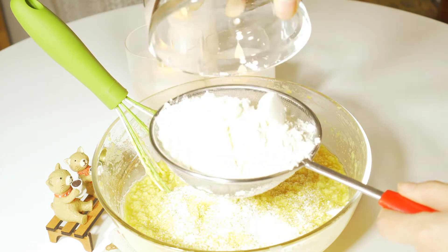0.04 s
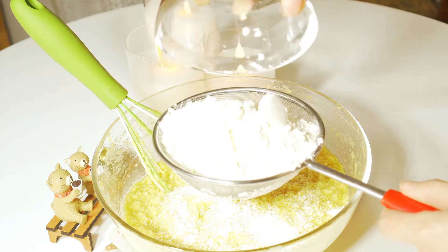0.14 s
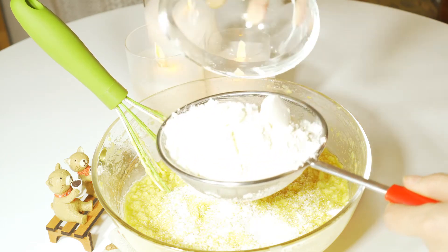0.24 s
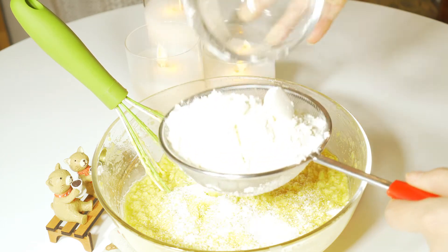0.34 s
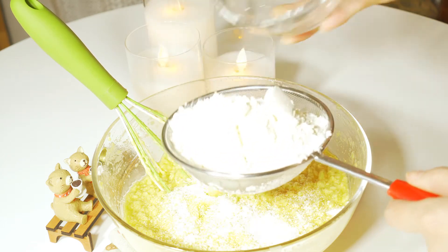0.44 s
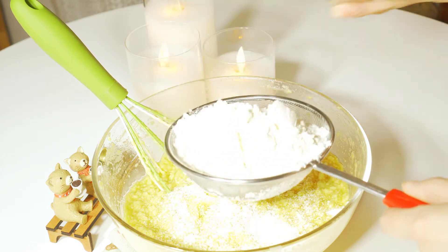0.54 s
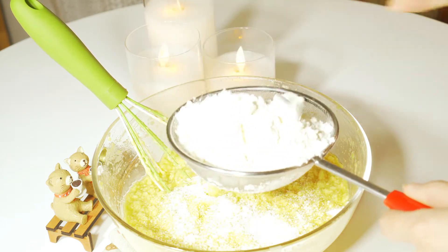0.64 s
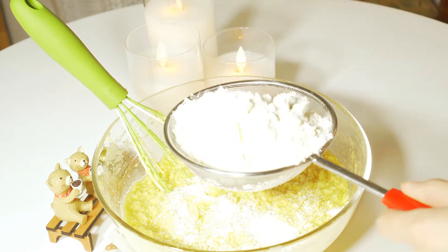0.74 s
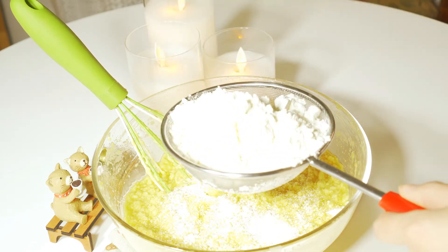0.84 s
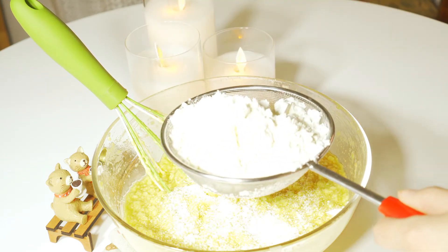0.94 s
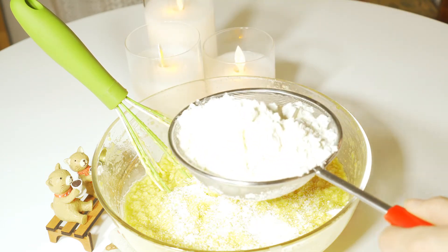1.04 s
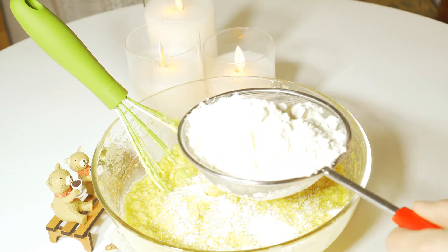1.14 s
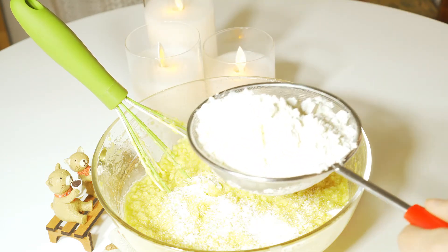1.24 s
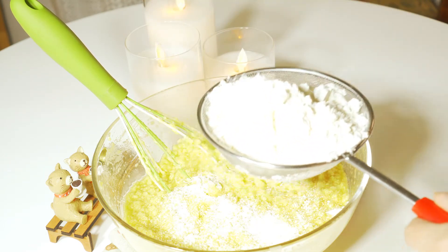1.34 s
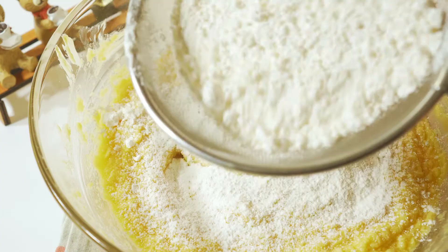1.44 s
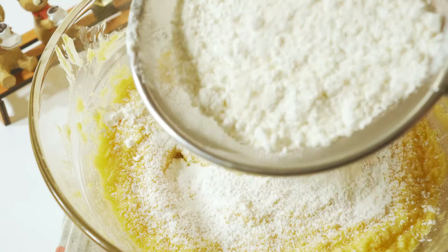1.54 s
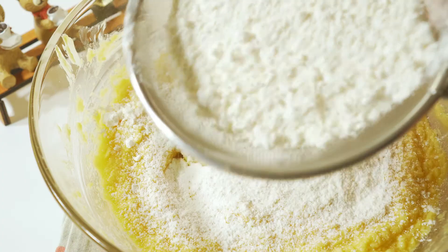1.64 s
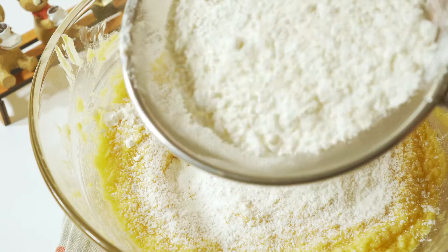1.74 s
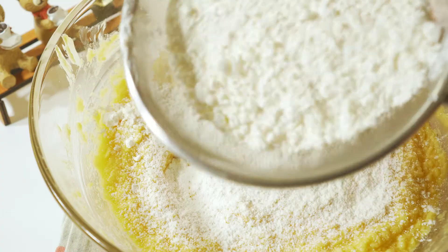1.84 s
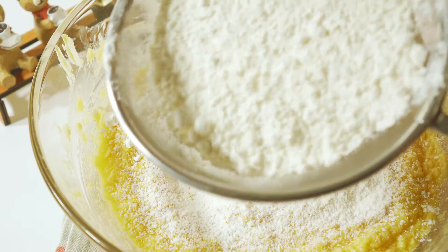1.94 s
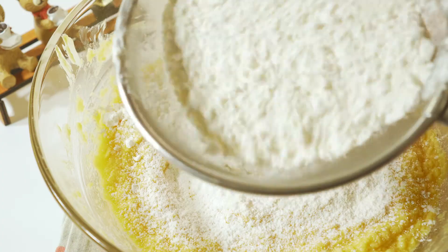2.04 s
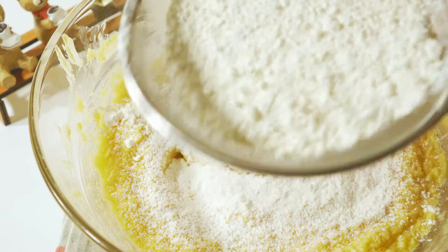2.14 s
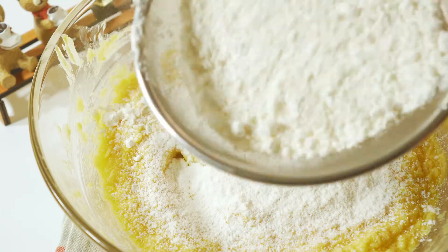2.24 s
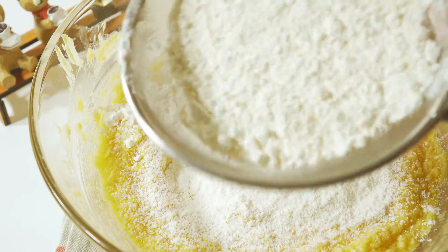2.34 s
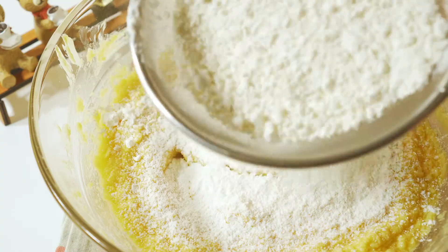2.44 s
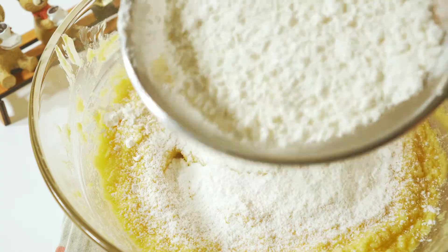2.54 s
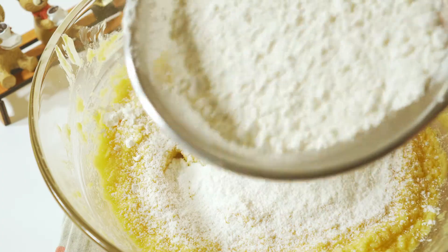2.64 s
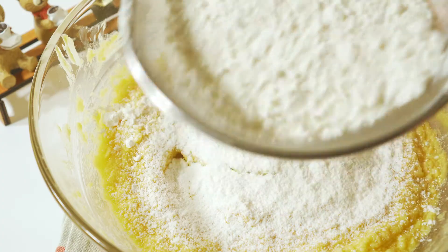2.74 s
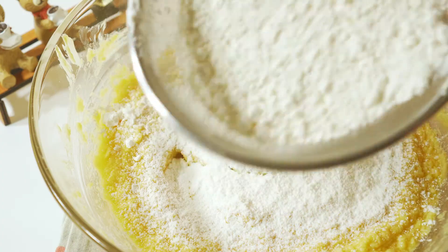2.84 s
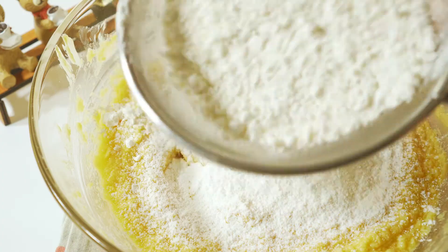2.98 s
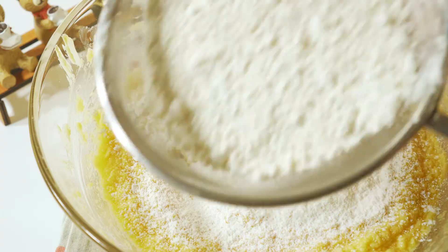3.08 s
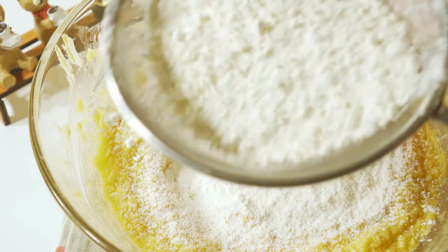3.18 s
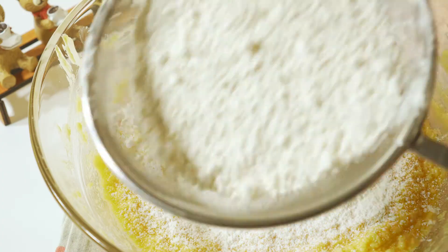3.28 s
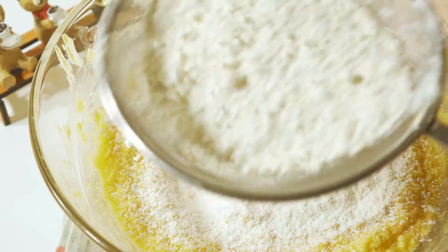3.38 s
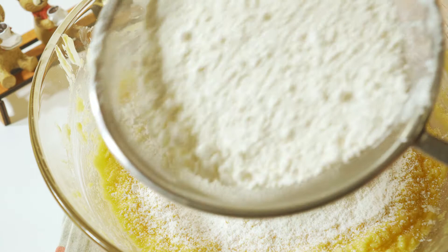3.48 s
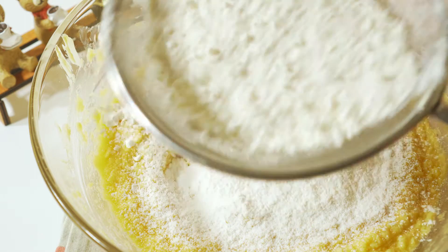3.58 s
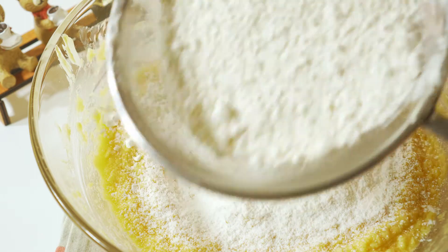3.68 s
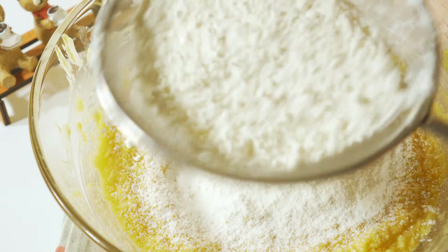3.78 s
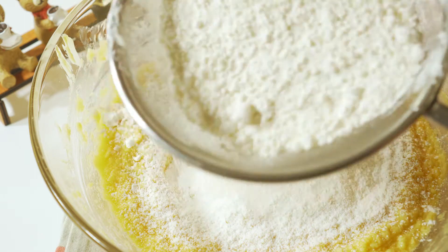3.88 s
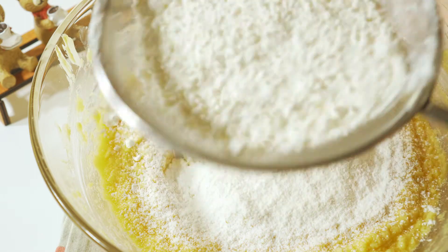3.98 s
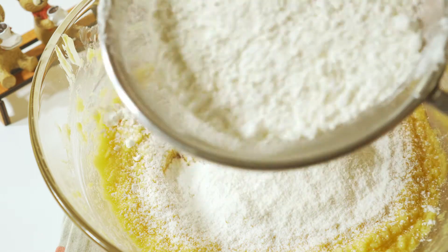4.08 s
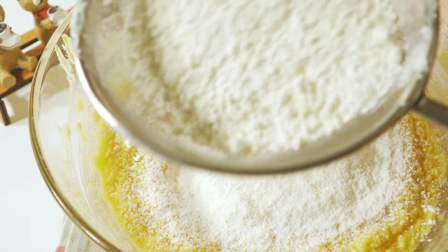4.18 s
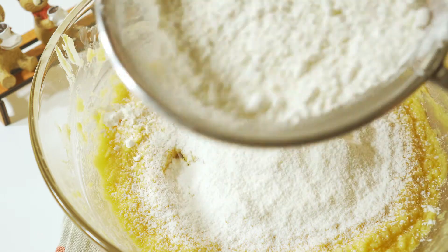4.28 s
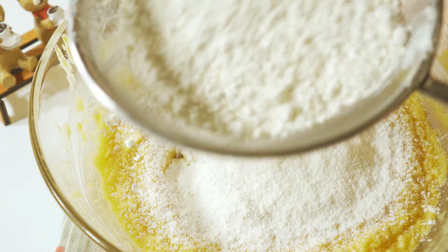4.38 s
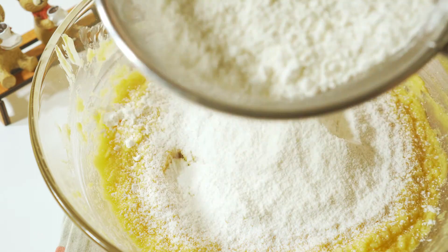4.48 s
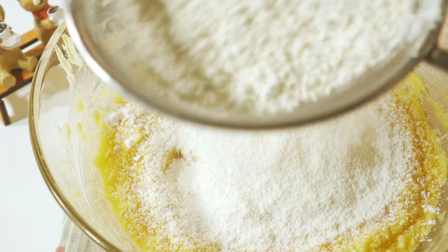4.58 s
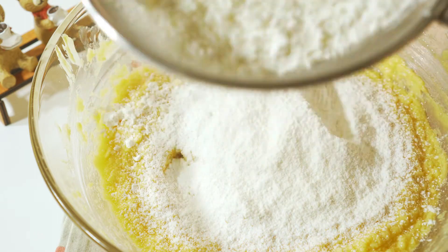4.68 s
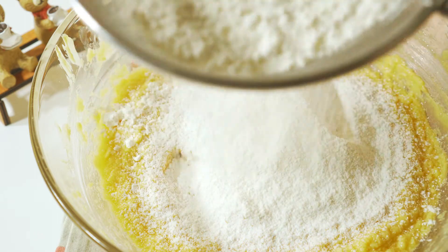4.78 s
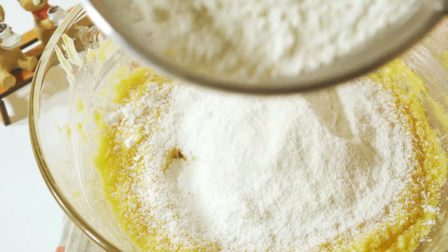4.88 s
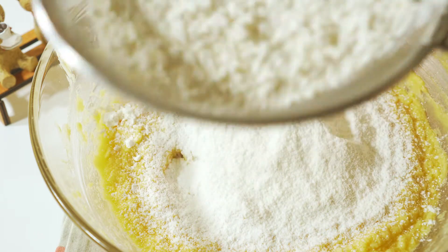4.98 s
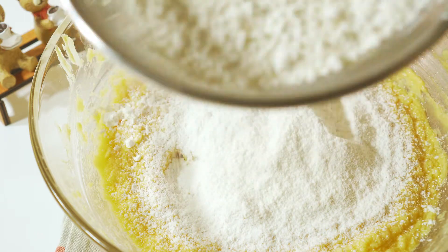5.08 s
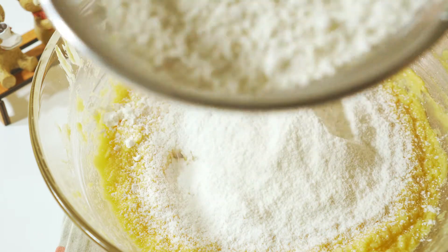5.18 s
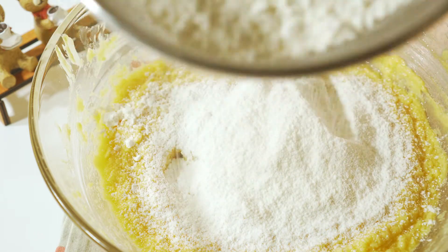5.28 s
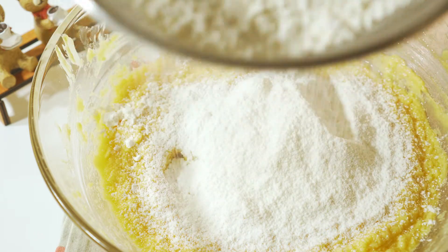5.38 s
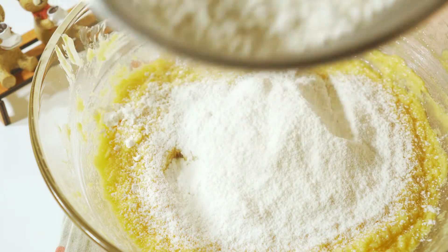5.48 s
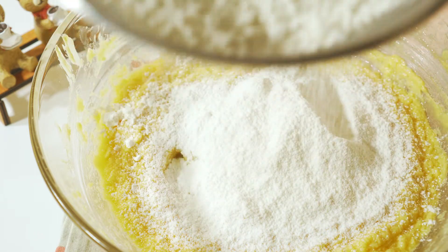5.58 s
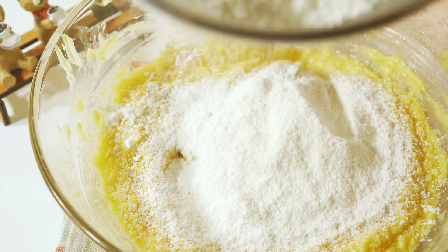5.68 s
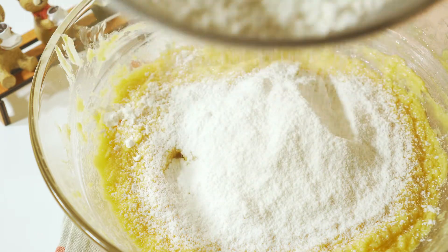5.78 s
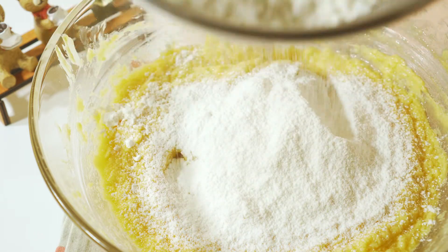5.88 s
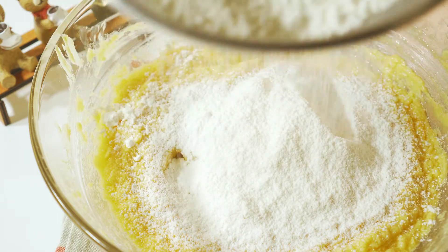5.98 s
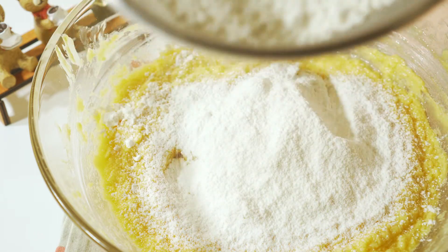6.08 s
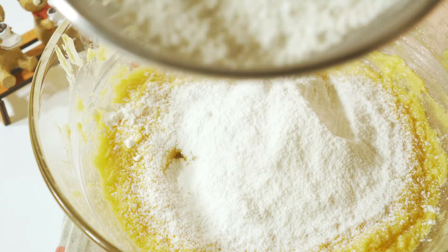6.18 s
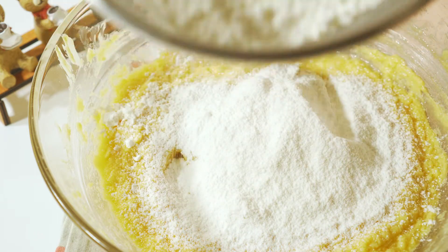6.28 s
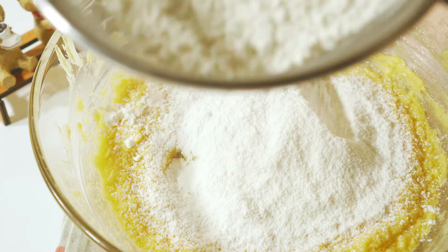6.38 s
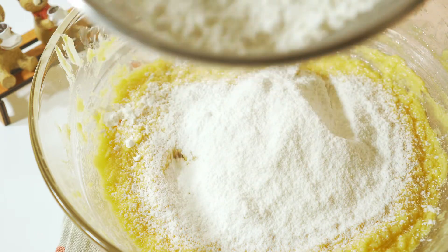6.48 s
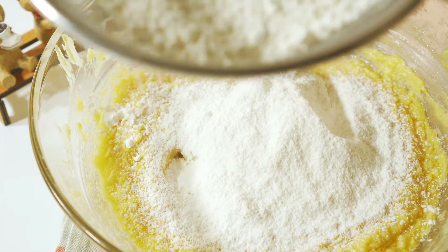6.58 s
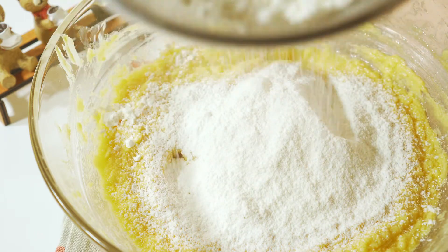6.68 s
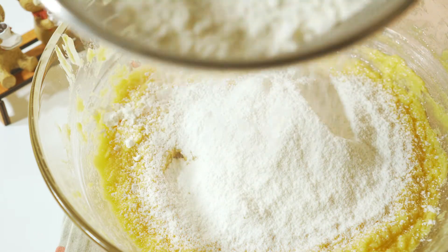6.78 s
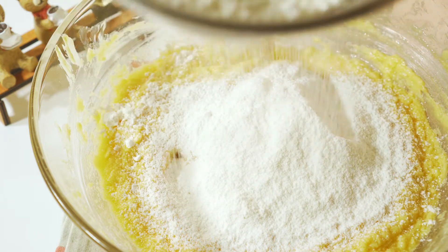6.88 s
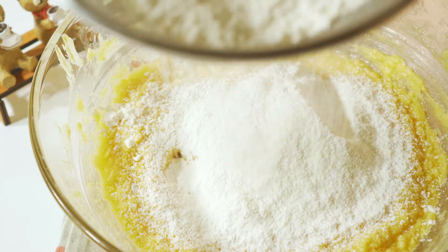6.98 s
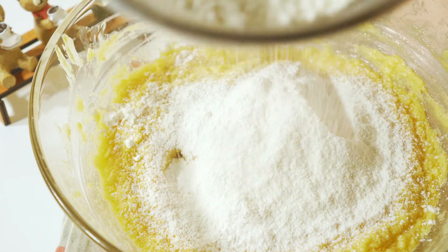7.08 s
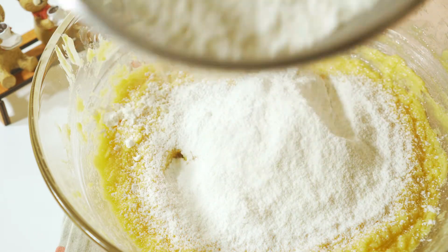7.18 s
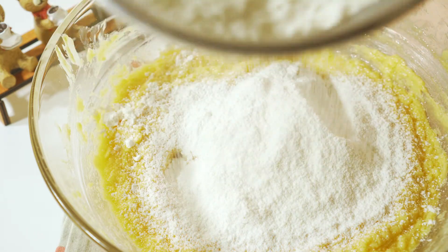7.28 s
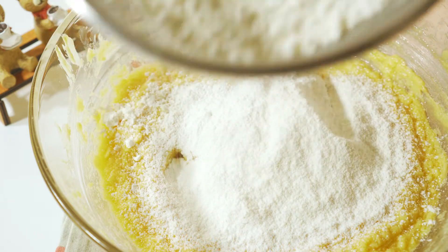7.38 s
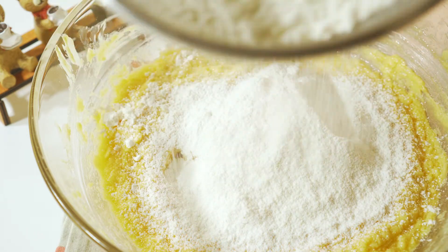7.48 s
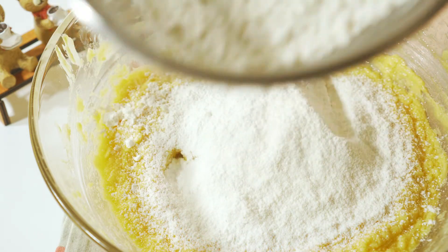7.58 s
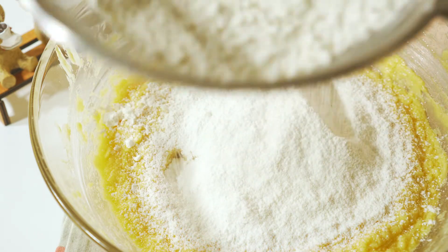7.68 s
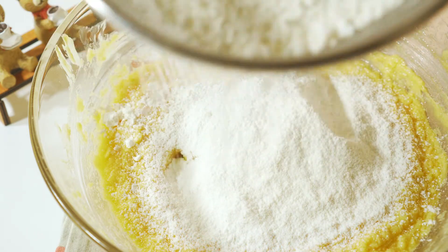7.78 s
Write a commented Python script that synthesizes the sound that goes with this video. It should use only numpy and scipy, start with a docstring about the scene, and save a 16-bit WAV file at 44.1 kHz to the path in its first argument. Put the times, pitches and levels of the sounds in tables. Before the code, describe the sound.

A faint rustle, then rapid soft thumps and dry hisses as a sieve of flour is tapped over a glass bowl.

```python
"""Flour is sifted through a fine metal sieve over a glass bowl, close on the left in a small kitchen.
At first the sieve is only swayed, with a faint rustle over a low throbbing hum. After a short silent
gap the throb is gone and the sieve is tapped about five times a second. Each time the flour slides
across the mesh, lands with a soft thump and hisses through the wires; three taps also nudge the bowl.
Room rumble and a thin appliance whine lie underneath."""
import sys
import numpy as np
from scipy import signal
from scipy.fft import rfft, irfft, next_fast_len
from scipy.io import wavfile
from scipy.ndimage import uniform_filter1d, map_coordinates

SR = 44100
rng = np.random.default_rng(int(sys.argv[2]) if len(sys.argv) > 2 else 0)


def generate_wav(signal):
    """Clip the signal to [-1, 1] and save it as 16-bit WAV at the path in sys.argv[1]."""
    frames = np.transpose(np.atleast_2d(signal))
    scaled = np.clip(frames, -1, 1) * 32767
    pcm = np.round(scaled).astype(np.int16)
    wavfile.write(sys.argv[1], SR, pcm)


N = 345303
TIME = np.arange(N) / SR
GAP_START_S, GAP_END_S = 1.453, 1.4995

# taps on the sieve: start_s, thump_db, thump_pitch_hz, knock_db
TAPS = [(1.512, -7, 130, -32), (1.7122, -13, 132, -32.5), (1.8704, -9, 152, -27.5),
        (2.0584, -8.5, 104, -31.5), (2.2278, -2, 123, -23), (2.4243, -2.5, 128, -24.5),
        (2.6151, -21.5, 82, -37.5), (2.806, -11, 155, -32), (3.027, -31.5, 84, -43.5),
        (3.2295, -21.5, 110, -38.5), (3.43, -3.5, 171, -31), (3.637, -15, 101, -28.5),
        (3.8622, -7, 154, -28), (4.068, -20, 100, -35.5), (4.2803, -12.5, 103, -30),
        (4.476, -2.5, 111, -22), (4.6782, -3.5, 118, -25.5), (4.8834, -6.5, 154, -33), (5.08, -1, 141, -25),
        (5.2613, 1.5, 157, -26.5), (5.4529, -4, 158, -34), (5.668, -8, 113, -26.5),
        (5.8618, -12, 96, -32.5), (6.0617, -14.5, 130, -44), (6.2755, -14, 90.5, -35),
        (6.4846, -15, 77.6, -34.5), (6.6852, -6, 136.6, -24), (6.9008, -4, 96, -26.5),
        (7.103, -6.5, 125, -28), (7.3282, -6.5, 147, -27), (7.5377, -9.5, 163, -33),
        (7.7558, -3, 128, -23.5)]
# spectrum of loose flour shifting: frequency_hz, level_db
RUSTLE = [(200, 8), (500, 4.5), (1400, 1), (2400, -2.5), (4300, -4), (7000, -12.5), (16000, -34)]


def thumps(push_db=-0.5, steepen=0.22, hard_db=-20, recoil=0.32):
    """The mesh is stopped and pushes the air once, recoils, then swings briefly under its load."""
    # modes of the loaded mesh: pitch_hz, level_db, t60_s
    mesh_modes = [(29.7, -9, 0.17), (76.3, 1, 0.07), (156, 1, 0.033), (249, 0, 0.04)]
    # swing of the mesh after a full-strength thump: time_s, level_db
    swing_curve = [(1.5, -16), (2.4, -13), (3.1, -18), (4.9, -23), (5.6, -12), (7.8, -14)]
    out = np.zeros(N)
    t = np.arange(-SR // 50, SR // 50) / SR
    for s, db, hz, knock_db in TAPS:
        hardness = min(amp(knock_db - db - hard_db) ** 2, 1)  # a cushioned landing stays round
        phase = np.sqrt(2) * np.pi * hz * t
        phase += steepen * hardness * (1 + np.tanh(3 * (phase - .7)))  # a hard one recoils abruptly
        push = (1 - phase ** 2) * np.exp(-phase ** 2 / 2)
        push *= 1 + recoil * hardness * amp(db) * phase  # a heavy one recoils further
        add(out, s + t[0], amp(db + push_db) * push)
        swing_db = np.interp(s, *np.transpose(swing_curve)) + 0.24 * db
        swing = ring(mesh_modes, scatter_db=3, detune=0.15, attack_s=0.0059)
        add(out, s + 0.0025, -amp(swing_db) * swing)
    return signal.sosfilt(signal.butter(1, 10, "high", fs=SR, output="sos"), out)


def knocks(crunch_db=3.0):
    """The heap packs against the wires with a dry crunch, and the rim rings for an instant."""
    # spectrum of the crunch: frequency_hz, level_db
    spectrum = [(150, -2.5), (300, 15), (460, 7.5), (660, 1), (900, -2.5), (1400, -8), (2100, -13),
                (4000, -16.5), (16000, -30)]
    # the steel rim, deadened by hand and flour: pitch_hz, level_db, t60_s
    rim_modes = [(446, 0.5, 0.029), (640, -9.5, 0.011), (750, -7.5, 0.018), (1080, -21, 0.064),
                 (1420, -6, 0.03), (1647, -7.5, 0.027)]
    times, _, _, knock_db = np.transpose(TAPS)
    crunch = bursts(times, knock_db + crunch_db, rise_s=0.0021, fall_s=0.0044, tail_db=-12, tail_s=0.025)
    out = crunch * grains(spectrum, rate=5500)
    for s, db in zip(times, knock_db):
        add(out, s + 0.00032, amp(db) * ring(rim_modes, scatter_db=2.5, detune=0.04, attack_s=0.00084))
    return out


def bowl():
    """When the sieve nudges it, the full bowl answers with a short hollow note."""
    # hard taps that reach the bowl: start_s, level_db
    nudges = [(2.2245, -30), (2.423, -28), (7.7555, -31)]
    # the glass, deadened by batter: pitch_hz, level_db, t60_s
    glass_modes = [(476, 1, 0.053), (788, -1, 0.065), (866, -3, 0.07)]
    out = np.zeros(N)
    for s, db in nudges:
        add(out, s, amp(db) * ring(glass_modes, scatter_db=2, detune=0.005, attack_s=0.0013))
    return out


def hisses(gain_db=5.0, touch_db=-11, snap_db=-17):
    """A first touch stirs the flour, the wires snap, a puff is driven through and a trickle follows."""
    # how freely the flour runs through the wires: time_s, level_db
    flow_curve = [(1.5, -43.5), (2.25, -52.5), (2.75, -43.5), (4.3, -41), (5.3, -50.5), (5.8, -44),
                  (7.8, -43)]
    # spectrum of the passing powder: frequency_hz, level_db
    hiss_spectrum = [(200, -43), (700, 7), (1500, 7), (2300, 2.5), (4000, 3), (6000, -3), (10000, -3.5),
                     (16000, -15)]
    # spectrum of the snapping wires: frequency_hz, level_db
    snap_spectrum = [(1500, -16), (5000, -5), (10000, -4), (16000, -1)]
    times, _, _, knock_db = np.transpose(TAPS)
    flow_db = np.interp(times, *np.transpose(flow_curve))
    hiss_db = gain_db + flow_db + 0.17 * (knock_db - np.median(knock_db))  # harder taps hiss more
    puff_s = 0.0093 * amp(0.18 * (flow_db - flow_db.mean()))  # freer flow, longer puff
    touch = bursts(times - .0055, hiss_db + touch_db,
                   rise_s=0.00046, fall_s=0.0039, tail_db=-30, tail_s=.01)
    puff = bursts(times + 0.0024, hiss_db, rise_s=0.003, fall_s=puff_s, tail_db=-11, tail_s=0.033)
    snap = bursts(times + 0.0011, knock_db + snap_db,
                  rise_s=0.0015, fall_s=0.005, tail_db=-25, tail_s=.005)
    clumps = unit(amp(1.6 * wobble(600)))  # the powder passes in small clumps
    powder = (touch + puff) * clumps * grains(hiss_spectrum, rate=7000)
    return powder + snap * grains(snap_spectrum, rate=9000)


def crumbs(count=3, gain_db=-22):
    """A few lumps thrown up by each tap drop back on the heap."""
    times, _, _, knock_db = np.transpose(TAPS)
    landings = times[:, None] + rng.uniform(0.0068, 0.0512, (len(times), count))
    throw_db = (knock_db[:, None] + np.median(knock_db)) / 2
    lump_db = throw_db + gain_db + 2 * rng.standard_normal(landings.shape)
    patter = bursts(landings, lump_db, rise_s=0.0011, fall_s=0.0031, tail_db=-33, tail_s=.006)
    return patter * grains(RUSTLE, rate=5900)


def slides(shift_db=-52, lead_s=0.043):
    """On the swing before each tap the heap shifts on the mesh; some swings send all of it sliding."""
    # slides of the whole heap: centre_s, level_db
    heap_slides = [(2.403, -39), (2.595, -45), (2.775, -49), (2.972, -40.5), (3.584, -45), (3.807, -40.5),
                   (4.222, -47.5), (4.642, -41), (6.86, -41.5), (7.065, -48.5), (7.281, -46.5),
                   (7.709, -42)]
    # spectrum of flour dragging over the mesh: frequency_hz, level_db
    spectrum = [(300, -5), (800, 4), (1500, 1), (2400, -4.5), (4200, -3.5), (6500, -8), (16000, -14.5)]
    shifts = sum(amp(shift_db) * swell(s - lead_s, width_s=0.045) for s, *_ in TAPS)
    whole_heap = sum(amp(db) * swell(s, width_s=0.028) for s, db in heap_slides)
    drag = amp(1.5 * wobble(120))
    return np.hypot(shifts, whole_heap) * drag * grains(spectrum, rate=9000)


def swaying():
    """Flour shifts softly while the sieve is swayed, up to the gap."""
    # rise and fall of the rustle: time_s, level_db
    sway_curve = [(0, -70), (.28, -55), (.4, -51), (.62, -49.5), (.8, -52), (.95, -45), (1.05, -48),
                  (1.2, -46), (1.45, -51)]
    level_db = np.interp(TIME, *np.transpose(sway_curve)) + 0.38 * wobble(16)
    return amp(level_db) * grains(RUSTLE, rate=5000) * (TIME < GAP_START_S)


def brushes(octaves=0.46):
    """Single lumps brush along the wires, each a short swell of band noise."""
    # brushes on the mesh: centre_s, width_s, pitch_hz, level_db
    strokes = [(0.38, 0.012, 1400, -46.5), (.67, 0.008, 4500, -50), (0.885, 0.004, 3700, -42.5),
               (0.971, 0.003, 3700, -38), (1.443, 0.0055, 3580, -42), (2.855, 0.0041, 1340, -43),
               (3.906, 0.005, 1450, -44), (5.362, 0.031, 1740, -44.5), (5.898, 0.0016, 1190, -33.5)]
    out = np.zeros(N)
    for s, width_s, pitch_hz, db in strokes:
        band = lambda hz: 1 / (1 + (np.log2((hz + 1) / pitch_hz) / octaves) ** 2)
        out += amp(db) * swell(s, width_s) * unit(filtered(rng.standard_normal(N), band))
    return out


def walls(x, t60_s=0.12, wet_db=-23):
    """The kitchen walls return a faint, short reverb."""
    t = np.arange(SR // 3) / SR
    tail = rng.standard_normal(len(t)) * amp(-60 * t / t60_s) * (t > .006)
    return amp(wet_db) * signal.fftconvolve(x, tail / np.linalg.norm(tail))[:N]


def throb(beat_hz=25, dispersion=0.1557):
    """A motor's steady low hum; its lower harmonics arrive later, so each beat sags in pitch."""
    # the motor's harmonics, from the second upwards: level_db
    harmonics = [-48.5, -53, -50.5, -49, -54, -54, -56.5, -59.5, -61, -70, -60]
    phase = 2 * np.pi * beat_hz * TIME
    return sum(amp(db + 0.95 * wobble(8.4)) * np.cos(k * phase + dispersion * k * k)
               for k, db in enumerate(harmonics, start=2))


def room_tone(before_db=-46.5, after_db=-47.0):
    """Low room rumble, with the motor's throb before the gap and a slight drift in level after it."""
    # rumble before the gap: frequency_hz, level_db
    before_spectrum = [(22, -16), (50, -11), (120, -3.5), (220, -10), (400, -16), (700, -20), (1400, -21),
                       (2000, -29), (5000, -31.5), (16000, -30)]
    # rumble after the gap: frequency_hz, level_db
    after_spectrum = [(25, -22), (55, 4), (110, 2), (175, 1), (250, -4), (400, -9.5), (620, -16),
                      (950, -15), (1300, -17), (2000, -25.5), (4000, -31), (16000, -92)]
    before = amp(before_db) * coloured(rng.standard_normal(N), before_spectrum) + throb()
    after = amp(after_db + 0.7 * wobble(6)) * coloured(rng.standard_normal(N), after_spectrum)
    return np.where(TIME < GAP_START_S, before, after)


def whine():
    """An appliance holds two thin, slightly wavering tones."""
    # its tones around the gap: pitch_hz, before_db, after_db
    tones = [(960, -71, -59.5), (2987, -65, -67)]
    out = np.zeros(N)
    for hz, before_db, after_db in tones:
        level_db = np.where(TIME < GAP_START_S, before_db, after_db) + 1.5 * wobble(20)
        out += amp(level_db) * np.sin(2 * np.pi * hz * TIME + .7 * wobble(18))
    return out


def amp(db):
    """Decibels to gain."""
    return 10 ** (np.asarray(db) / 20)


def unit(x):
    """Scale to rms 1."""
    return x / np.sqrt(np.mean(x ** 2) + 1e-20)


def filtered(x, response):
    """Filter x by a gain given as a function of frequency."""
    size = next_fast_len(N + SR // 2)
    return irfft(rfft(x, size) * response(np.fft.rfftfreq(size, 1 / SR)), size)[..., :N]


def coloured(x, spectrum):
    """Shape x by (frequency_hz, level_db) points on a log axis, at rms 1."""
    points_hz, db = np.transpose(spectrum)
    return unit(filtered(x, lambda hz: amp(np.interp(np.log(hz + 1), np.log(points_hz), db))))


def wobble(rate):
    """A smooth random curve, rate knots a second."""
    return map_coordinates(rng.standard_normal(int(N * rate / SR) + 4), [TIME * rate])


def grains(spectrum, rate):
    """Countless tiny impacts, rate a second, at rms 1."""
    return coloured(rng.standard_normal(N) * (rng.random(N) < rate / SR), spectrum)


def add(track, start_s, sound):
    """Mix a sound into the track."""
    part = track[round(start_s * SR):][:len(sound)]
    part += sound[:len(part)]


def ring(modes, scatter_db, detune, attack_s):
    """Damped modes, struck at new strengths each time; the shifting load detunes them."""
    t = np.arange(SR // 5) / SR
    tone = np.zeros(len(t))
    for hz, db, t60_s in modes:
        decay = amp(db + scatter_db * rng.normal() - 60 * t / t60_s)
        tone += decay * np.sin(2 * np.pi * hz * (1 + detune * rng.normal()) * t)
    return tone * (1 - np.exp(-t / attack_s))


def swell(centre_s, width_s):
    """A bell-shaped envelope."""
    return np.exp(-2 * np.minimum(((TIME - centre_s) / width_s) ** 2, 20))


def bursts(times, levels_db, rise_s, fall_s, tail_db, tail_s):
    """An envelope of quick bursts, each with a weak longer tail."""
    envelope = np.zeros(N)
    t = np.arange(-SR // 50, SR // 5) / SR
    after = np.maximum(t, 0)
    attack = np.exp(np.minimum(t, 0) / rise_s)
    tail = amp(tail_db) * np.exp(-after / tail_s)
    for s, db, length_s in np.broadcast(times, levels_db, fall_s):
        body = np.exp(-(after / length_s) ** 2)
        add(envelope, s + t[0], amp(db) * attack * (body + tail))
    return envelope


def scene(right_db=-19.5):
    """The close sieve in its kitchen, all far stronger on the left than on the right."""
    sieve = thumps() + knocks() + bowl() + hisses() + crumbs() + slides() + swaying() + brushes()
    sound = sieve + walls(sieve) + room_tone() + whine()
    return np.array([sound, amp(right_db) * sound])


def record(dry, left_noise_db=-52.0, right_noise_db=-61.0, ceiling=.93, top_hz=15900):
    """Each side gets an even hiss; peaks are rounded, the sound drops out briefly, the top is cut."""
    noisy = dry + amp([[left_noise_db], [right_noise_db]]) * rng.standard_normal((2, N))
    rounded = noisy / (1 + np.abs(noisy / ceiling) ** 8) ** (1 / 8)
    gate = uniform_filter1d(1. * ((TIME < GAP_START_S) | (TIME > GAP_END_S)), size=100)
    return filtered(rounded * gate, lambda hz: hz < top_hz)


dry = scene()
out = record(dry)
generate_wav(out)
```